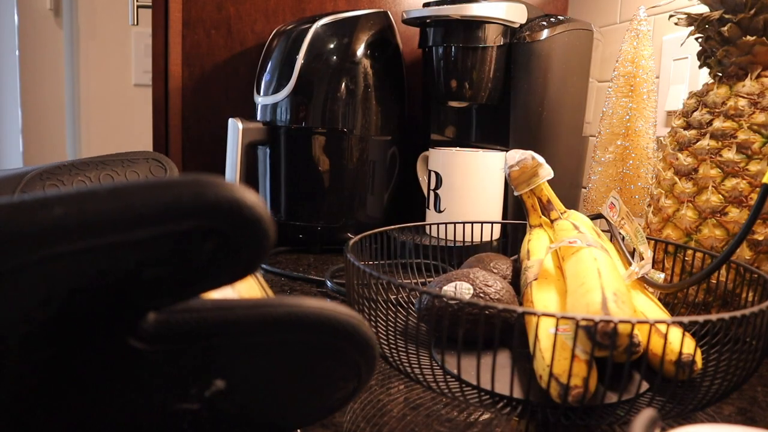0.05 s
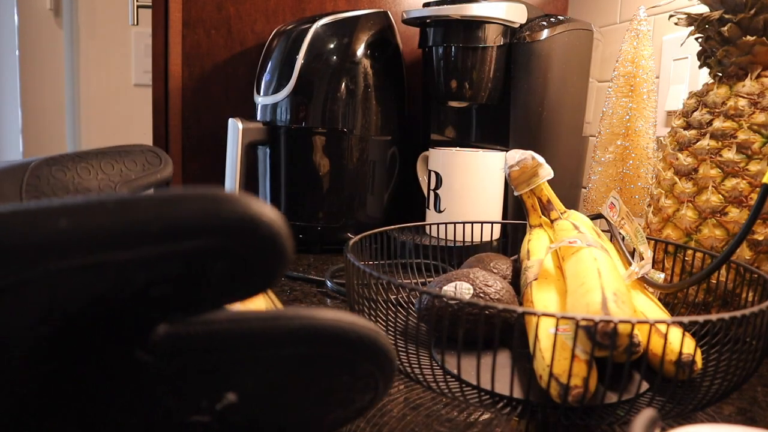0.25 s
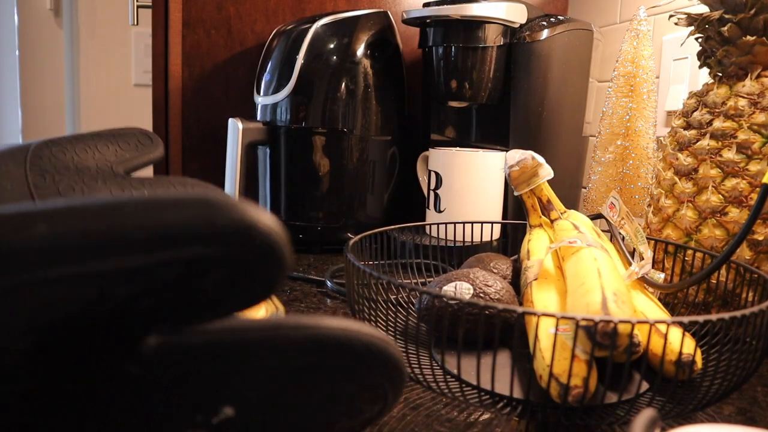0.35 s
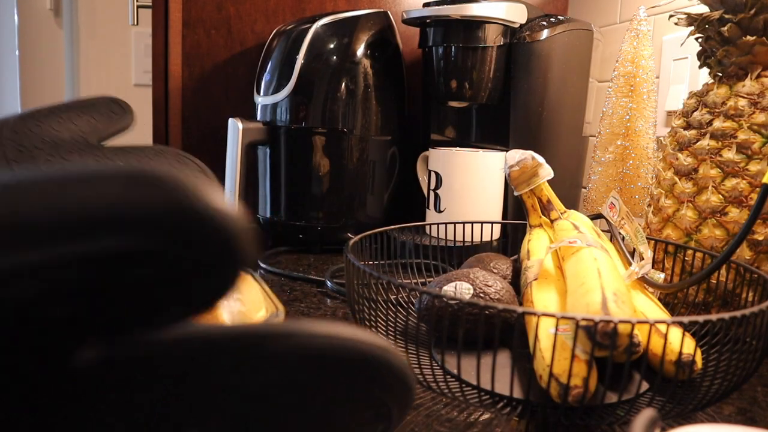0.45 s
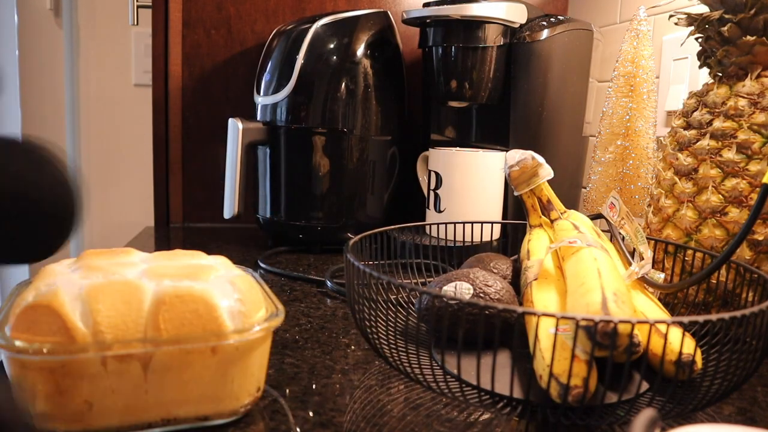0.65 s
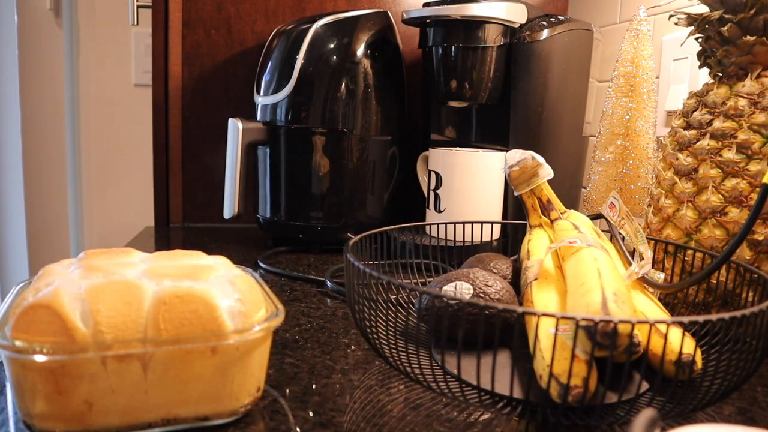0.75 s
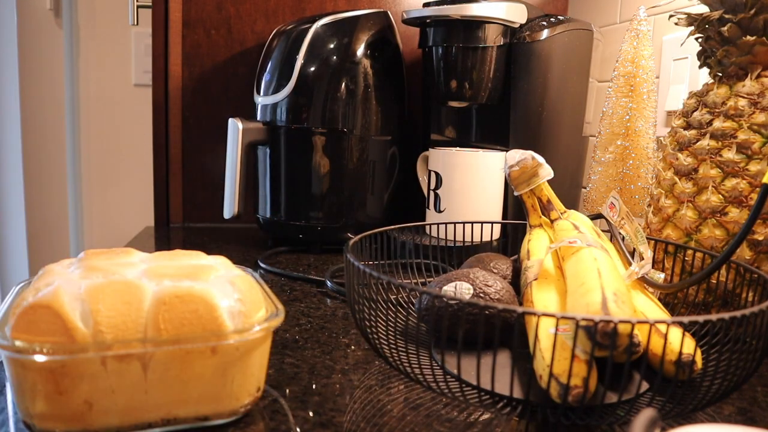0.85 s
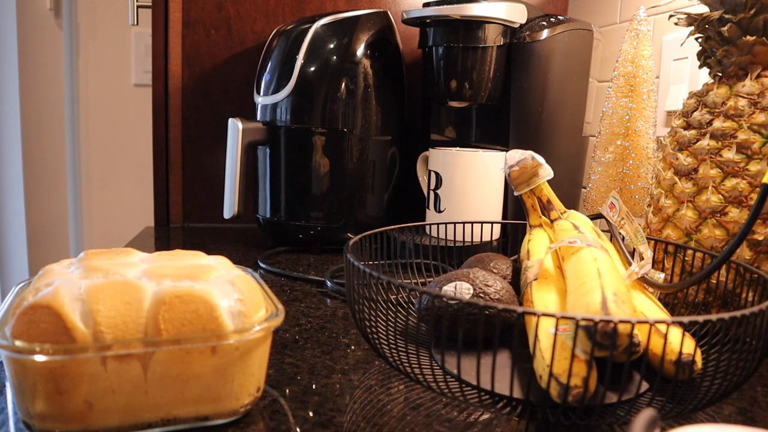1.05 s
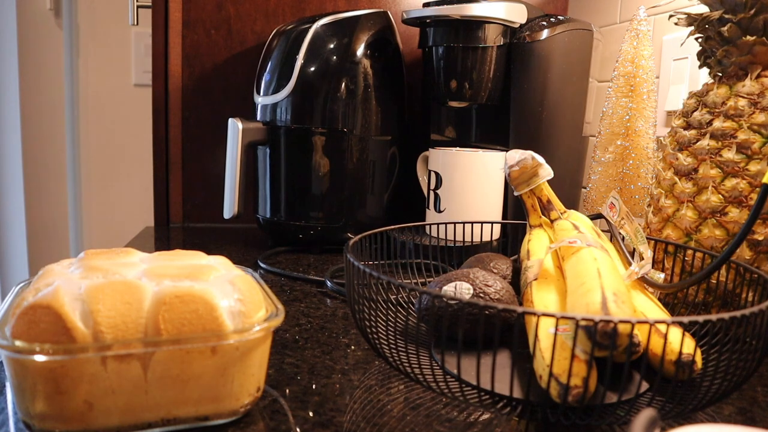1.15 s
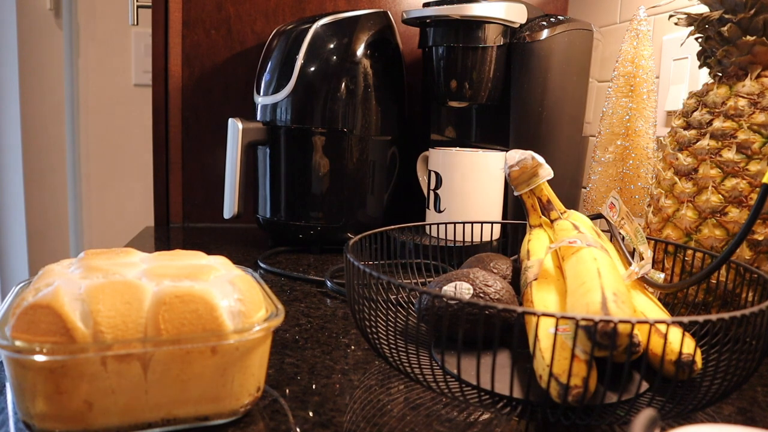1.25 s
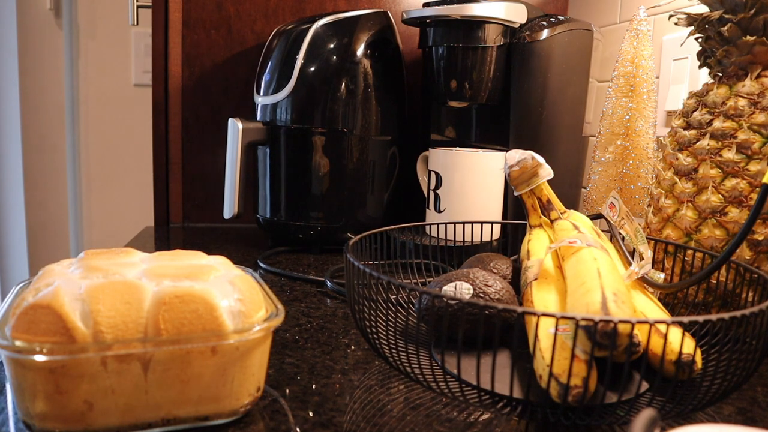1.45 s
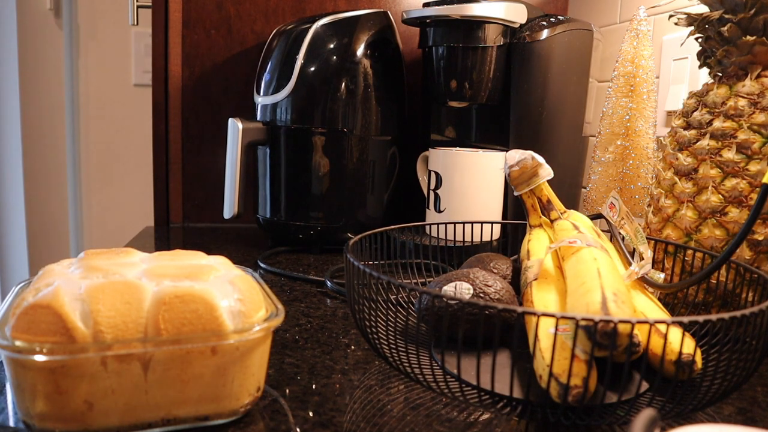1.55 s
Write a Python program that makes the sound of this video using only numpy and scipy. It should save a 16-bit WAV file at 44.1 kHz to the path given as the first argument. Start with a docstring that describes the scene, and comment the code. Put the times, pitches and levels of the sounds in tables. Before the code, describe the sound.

Quiet kitchen hiss and low appliance hum. At 0.2 s a filled glass baking dish hits a stone counter: one loud, hard, overloaded knock with a short glassy ring. The level ducks, then the bright room tail swells back and fades over about a second. Soft glove rustle around 0.75 and 1.1 s, a small plastic click at 0.92, dull bumps at 0.98 and 1.13, faint airy ticks from 1.23 to 1.53.

```python
"""A glass baking dish lands on a stone counter: noisy contact and a sharp blow set off decaying modes.
The kitchen answers with early reflections and a dense tail whose bands decay at their own rates.
The knock overloads the input; the gain control dives and recovers, so the room's ring swells up again.
A small plastic click, dull bumps and faint ticks follow as filtered pulses and noise puffs,
over a soft rustle of gloves, steady appliance hum and patchy room hiss."""
import sys
import numpy as np
from scipy import signal
from scipy.fft import rfft, irfft
from scipy.io import wavfile
from scipy.ndimage import uniform_filter1d, minimum_filter1d

SR = 44100
rng = np.random.default_rng(int(sys.argv[2]) if len(sys.argv) > 2 else 0)


def nominal_scale(level):
    """Amplitude ratio for a level in decibels (scalar or array-like)."""
    x = np.asarray(level, float) / 20
    return 10 ** x


def log_audio(samples):
    """Write samples as a 16-bit WAV file to the path given in sys.argv[1]."""
    # one column per channel
    frames = np.atleast_2d(samples).T
    # limit to full scale, then quantise
    limited = np.clip(frames, -1, 1)
    pcm = np.round(limited * 32767).astype(np.int16)
    wavfile.write(sys.argv[1], SR, pcm)


N = 70560  # samples, 1.6 s

# Spectra below are relative: each is scaled to unit rms or unit peak before its level is set.
# Modes of dish and slab, levels relative before the root-width weighting: pitch_hz, width_hz, level_db
DISH_MODES = [(132.4, 41, -2), (114.7, 5, -5), (317, 20, 0.5), (396, 89, 1), (484, 26, -4.5),
              (686, 180, -8), (799, 11.6, 0), (1065, 50, -17), (1227, 87, 4.5), (1337, 54, 2),
              (1474, 41, -1), (1676, 24, 0.5), (1772, 76, 2.5), (1902, 20, -4), (2150, 110, -10.5),
              (2521, 26, 5), (2615, 24, 1), (2866, 84, -0.5), (3280, 56, -30), (3422, 120, 0),
              (3896, 60, 0.5), (3948, 130, -3), (4220, 30, -12), (4406, 99, -12), (4570, 43, -18.5),
              (4753, 120, -6), (5324, 110, 1.5), (6900, 100, -11), (7060, 91, -7.5), (7970, 43, -11.5),
              (8265, 40, -9), (9540, 43, -9.5), (9900, 50, -13.5), (11450, 40, -20), (12020, 30, -15.5),
              (12650, 60, -12), (13500, 60, -28), (14000, 80, -24), (14800, 90, -30)]
# Spectrum of the contact noise and blow: frequency_hz, density_db_per_hz
CONTACT_SPECTRUM = [(60, -30), (110, -14), (200, 0), (380, 7), (700, 3), (1020, -6), (1500, 3), (2040, -5),
                    (2540, -3), (3170, -8), (4200, -7), (9610, -17), (13500, -27), (16000, -48)]
LANDING_S = .2052  # the dish meets the stone
LOW_CUT_HZ = 105
# Levels of the landing's parts; KNOCK_DB raises all three together
KNOCK_DB, RING_DB, CRACK_DB, BLOW_DB = 6, -2, -5, 1.5
CRACK_T60_S, CRACK_RISE_S = .021, .0006

# Sharp pulses of the plastic click: start_s, peak_db
CLICKS = [(.92025, -14), (.92097, -13), (.9238, -25)]
# Spectrum of the plastic click: frequency_hz, density_db_per_hz
CLICK_SPECTRUM = [(150, -6), (350, 3), (600, 3), (1200, 3), (2100, -2), (3300, -4), (4200, 1), (5500, 1),
                  (6300, -5), (7600, -6), (9000, -20), (14000, -30)]
BODY_DB, BODY_T60_S, BODY_RISE_S = -17, .012, .0004  # diffuse after-sound; level against the pulse
CLICK_WET_DB = -2  # room sound of clicks, ticks and bumps

# Faint airy ticks, rms of the noise before its envelope: start_s, level_db
TICKS = [(1.2335, -51.5), (1.381, -50.5), (1.416, -44), (1.4386, -51), (1.533, -52)]
# Spectrum of a tick: frequency_hz, density_db_per_hz
TICK_SPECTRUM = [(1500, -23), (3000, -5), (5000, 2), (6500, 1), (9000, -17), (14000, -17)]
TICK_T60_S, TICK_RISE_S = .033, .0012

# Soft dull bumps: start_s, peak_db
BUMPS = [(.979, -31.5), (1.1313, -31), (1.1387, -30), (1.1425, -36)]
# Spectrum of a bump: frequency_hz, density_db_per_hz
BUMP_SPECTRUM = [(100, -20), (250, 6), (450, 8.5), (800, -2), (1200, -9), (5000, -26), (9000, -36)]
BUMP_NOISE_DB, BUMP_T60_S, BUMP_RISE_S = -7, .06, .0019  # noise level against the pulse

# Swells of the gloves' rustle: middle_s, half_length_s, rms_db at the middle
RUSTLES = [(0.756, 0.2, -53.5), (1.108, 0.12, -55)]
# Spectrum of the rustle: frequency_hz, density_db_per_hz
RUSTLE_SPECTRUM = [(1500, -2), (3500, -7.5), (7000, -9.5), (13000, -19), (16000, -31)]

# Decay of the kitchen's tail: frequency_hz, t60_s
ROOM_DECAY = [(120, 0.51), (400, 0.43), (1200, 0.97), (3000, 0.92), (6000, 0.82), (12000, 0.4)]
ROOM_DB, ROOM_START_S = -3, .0022  # energy of the tail against the direct sound; its onset
# First reflections, relative to the sound sent into the room: delay_s, level_db
ECHOES = [(.0012, -15.5), (.0042, -14), (.0078, -13), (.0125, -15)]

# Spectrum of the room hiss: frequency_hz, density_db_per_hz
HISS_SPECTRUM = [(12, -32.5), (22, -10), (58, -3), (86, -18.5), (115, -3), (198, 0), (262, -20), (311, 0.5),
                 (378, -5.5), (460, 0), (500, -13.5), (719, -9), (2330, -23.5), (6200, -32), (16100, -36.5)]
HISS_DB, PATCHY_DB = -44, .8  # overall rms; rms depth of the patches
# Appliance hum: pitch_hz, rms_db
HUM = [(59.2, -56), (118.4, -56)]

# Gain control: dB of cut per dB above the threshold, then its time constants
THRESHOLD_DB, SQUEEZE = -15, 1
SENSE_S, DIVE_S, HOLD_S, RECOVER_DB_PER_S = .003, .032, .03, 2000
CEILING = 1.02  # clipping amplitude of the input


def dish():
    """Impact excitation: contact noise and a blow accompany the decaying modes; rows ring, crack, blow."""
    out = np.zeros((3, N))
    modes = 0
    for k, (hz, width, db) in enumerate(DISH_MODES):
        weight = (-1) ** k * nominal_scale(db) * np.sqrt(width)
        modes = modes + weight * ring(hz, 2.2 / width, .4)  # t60 is inverse to resonance width
    add(out[0], LANDING_S, nominal_scale(RING_DB) * modes / np.abs(modes).max())
    add(out[1], LANDING_S, nominal_scale(CRACK_DB) * burst(CONTACT_SPECTRUM, CRACK_T60_S, CRACK_RISE_S))
    add(out[2], LANDING_S, nominal_scale(BLOW_DB) * pulse(CONTACT_SPECTRUM))
    low_cut = signal.butter(4, LOW_CUT_HZ, "high", fs=SR, output="sos")
    return nominal_scale(KNOCK_DB) * signal.sosfilt(low_cut, out)


def ring(hz, t60, seconds):
    """Damped free vibration: one mode is a sine under exponential decay."""
    t = np.arange(round(seconds * SR)) / SR
    return nominal_scale(-60 * t / t60) * np.sin(2 * np.pi * hz * t)


def pulse(spectrum):
    """Minimum phase: the log spectrum's Hilbert transform makes a causal blow, scaled to peak 1."""
    size = 4096
    log_gain = np.log(nominal_scale(read(spectrum, abs(np.fft.fftfreq(size, 1 / SR)))))
    response = np.exp(np.conj(signal.hilbert(log_gain)))
    shape = np.fft.ifft(response).real[:size // 2]
    return shape / np.abs(shape).max()


def burst(spectrum, t60, rise_s):
    """Transient noise: a coloured random signal under a linear rise and an exponential decay."""
    t = np.arange(4096) / SR
    rise = np.minimum(t / rise_s, 1)
    return coloured(spectrum, len(t)) * rise * nominal_scale(-60 * t / t60)


def coloured(spectrum, size):
    """Spectral shaping: white noise filtered to the given density, at unit rms."""
    gain = nominal_scale(read(spectrum, np.fft.rfftfreq(size, 1 / SR)))
    return evened(irfft(rfft(rng.standard_normal(size)) * gain))


def evened(x):
    """Power normalisation: scales a signal to unit rms."""
    return x / np.sqrt(np.mean(x ** 2) + 1e-20)


def read(points, hz):
    """Logarithmic frequency scale: interpolates a table along log frequency."""
    f, value = np.transpose(points)
    return np.interp(np.log(hz + 1), np.log(f + 1), value)


def add(mix, s, sound):
    """Superposition: sums a sound into the mix from s seconds on."""
    part = mix[round(s * SR):][:len(sound)]
    part += sound[:len(part)]


def plastic_click():
    """Brief impact: bright pulses, each with a short diffuse after-sound."""
    out = np.zeros(N)
    for s, db in CLICKS:
        add(out, s, nominal_scale(db) * pulse(CLICK_SPECTRUM))
        add(out, s, nominal_scale(db + BODY_DB) * burst(CLICK_SPECTRUM, BODY_T60_S, BODY_RISE_S))
    return out


def bumps():
    """Soft impact: low-weighted inverted pulses, each with a decaying noise puff."""
    out = np.zeros(N)
    for s, db in BUMPS:
        add(out, s, -nominal_scale(db) * pulse(BUMP_SPECTRUM))
        add(out, s, nominal_scale(db + BUMP_NOISE_DB) * burst(BUMP_SPECTRUM, BUMP_T60_S, BUMP_RISE_S))
    return out


def ticks():
    """Transient noise: faint airy puffs that die exponentially."""
    out = np.zeros(N)
    for s, db in TICKS:
        add(out, s, nominal_scale(db) * burst(TICK_SPECTRUM, TICK_T60_S, TICK_RISE_S))
    return out


def gloves():
    """Friction noise: a steady coloured rustle under Gaussian swells."""
    t = np.arange(N) / SR
    swells = sum(nominal_scale(db) * np.exp(-((t - s) / half) ** 2) for s, half, db in RUSTLES)
    return coloured(RUSTLE_SPECTRUM, N) * swells


def kitchen(x):
    """Reverberation: convolution with first reflections and a noise tail whose bands decay separately."""
    taps = rng.standard_normal(SR + SR // 2)
    taps[:round(ROOM_START_S * SR)] = 0
    hz, t, z = signal.stft(taps, SR, nperseg=256)
    decay = nominal_scale(-60 * t / read(ROOM_DECAY, hz)[:, None])
    tail = signal.istft(z * decay, SR, nperseg=256)[1]
    response = nominal_scale(ROOM_DB) * tail / np.linalg.norm(tail)
    for k, (s, db) in enumerate(ECHOES):
        add(response, s, np.array([(-1) ** k * nominal_scale(db)]))
    return signal.fftconvolve(x, response)[:N]


def hum():
    """Periodic vibration: steady sines at random starting phases."""
    t = np.arange(N) / SR
    return sum(np.sqrt(2) * nominal_scale(db) * np.sin(2 * np.pi * (hz * t + rng.random())) for hz, db in HUM)


def hiss():
    """Random-process synthesis: Gaussian spectra whose level drifts in patches of time and frequency."""
    frames, hz = N // 256 + 5, np.fft.rfftfreq(1024, 1 / SR)
    real, imaginary, patches = rng.standard_normal((frames, 513, 3)).T
    patches = uniform_filter1d(patches, size=12, axis=0)  # smooth over frequency
    patches = evened(uniform_filter1d(patches, size=14, axis=1))  # smooth over time
    gain = nominal_scale(read(HISS_SPECTRUM, hz)[:, None] + PATCHY_DB * patches)
    noise = signal.istft((real + 1j * imaginary) * gain, nperseg=1024, noverlap=768)[1][:N]
    return nominal_scale(HISS_DB) * evened(noise)


def scene():
    """Mixing: ring, crack and blow each get an independently drawn room tail; small sounds share another."""
    knock = dish()
    small = plastic_click() + ticks() + bumps()
    wet = sum(kitchen(part) for part in knock) + nominal_scale(CLICK_WET_DB) * kitchen(small)
    return (knock.sum(axis=0) + small + wet + gloves() + hum() + hiss())[None]


def trailing_mean(x, seconds):
    """Causal smoothing: the mean over the window just past."""
    size = max(round(seconds * SR), 1)
    return signal.oaconvolve(x, np.ones(size) / size)[:len(x)]


def roll_off(x):
    """The treble ends steeply here."""
    return signal.sosfilt(signal.butter(12, 16220, fs=SR, output="sos"), x)


def record(dry):
    """Dynamic compression: gain follows the sensed level, dives, holds and recovers; then the input clips."""
    level_db = 10 * np.log10(abs(trailing_mean(dry[0] ** 2, SENSE_S)) + 1e-12)
    cut_db = SQUEEZE * np.maximum(level_db - THRESHOLD_DB, 0)
    half = round(HOLD_S * SR / 2)
    held = -minimum_filter1d(-cut_db, size=2 * half + 1, origin=half)  # greatest recent cut
    fall = np.arange(N) * RECOVER_DB_PER_S / SR
    recovering = np.maximum.accumulate(held + fall) - fall  # the cut shrinks at a limited rate
    cut_db = trailing_mean(recovering, DIVE_S)
    mix = np.clip(dry * nominal_scale(-cut_db), -CEILING, CEILING)
    return roll_off(mix)


dry = scene()
out = record(dry)
log_audio(out)
```